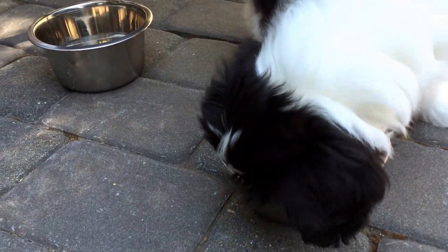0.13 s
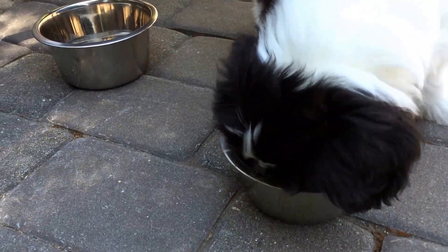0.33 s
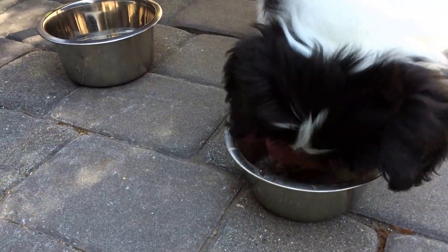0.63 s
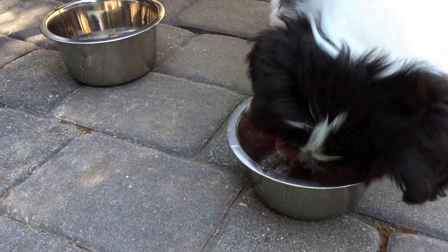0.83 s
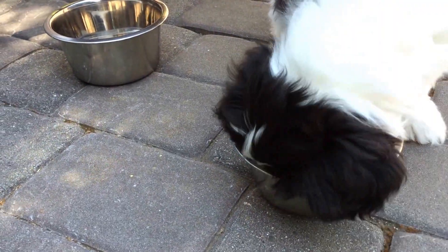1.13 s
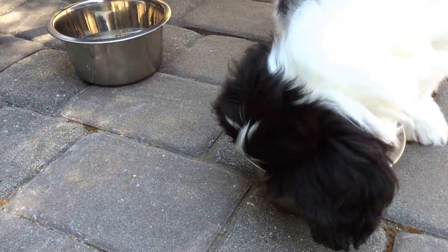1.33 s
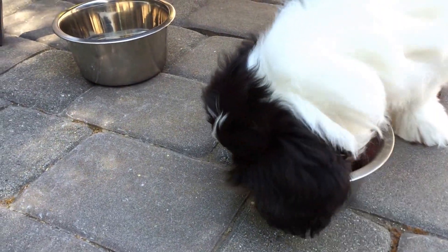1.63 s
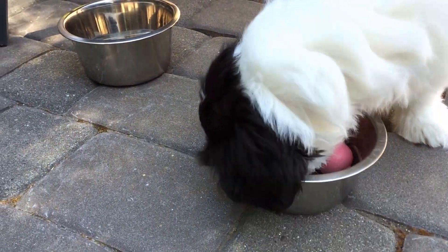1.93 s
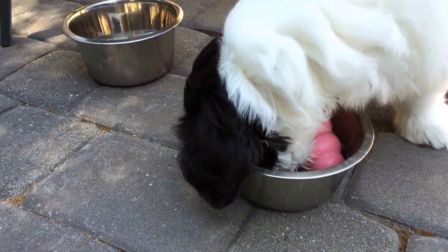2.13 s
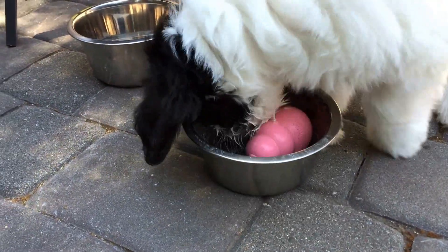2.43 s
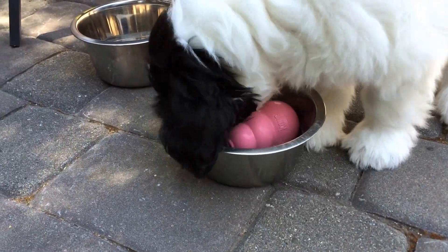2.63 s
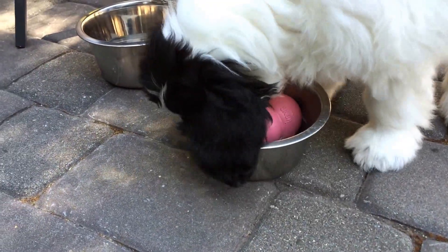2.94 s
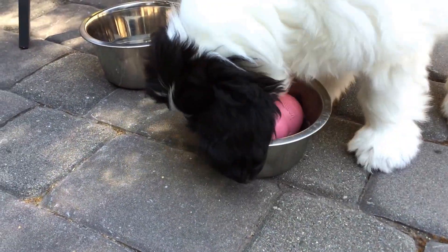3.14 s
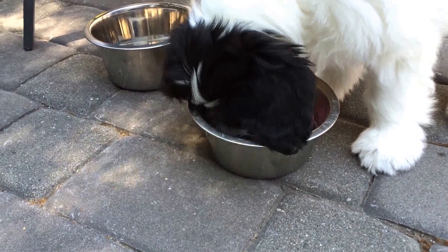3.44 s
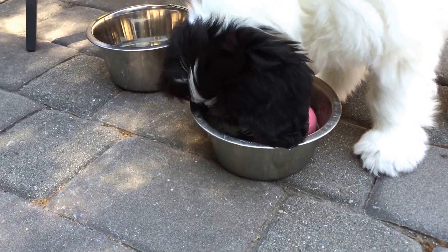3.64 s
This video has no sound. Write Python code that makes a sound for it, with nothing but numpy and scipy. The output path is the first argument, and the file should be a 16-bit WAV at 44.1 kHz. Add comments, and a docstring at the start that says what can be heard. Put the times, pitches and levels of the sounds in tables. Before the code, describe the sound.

A thin metal bowl scrapes on gritty paving, close and dry, outdoors. Faint scuffs and ticks until about 1 s, a short clinking scrape at 1.2, then stronger rasps from 1.5 with low microphone thuds near 1.7. From 2.1 to 2.8 s scraping is loudest and almost continuous, with sharp clacks and dull rubber bumps. Shorter scrapes and clinks follow, fading by 3.6 over soft distant traffic rumble.

```python
"""A thin steel bowl, pushed by a puppy's muzzle, skids over gritty paving stones close to the microphone.
Snapping grains and knocks from teeth and a rubber toy excite the bowl: hollow, wall, flank and rim ring
as banks of decaying sines. The toy itself bumps dully and a few low thuds shake the microphone, both as
short dying tones. Far off, traffic is coloured noise: hiss, a swelling rumble and narrow-band hums."""
import sys
import numpy as np
from scipy import signal
from scipy.fft import rfft, irfft
from scipy.io import wavfile
from scipy.ndimage import uniform_filter1d

SR = 44100
rng = np.random.default_rng(int(sys.argv[2]) if len(sys.argv) > 2 else 0)


def gain_from_db(level_db):
    """Convert decibel levels to linear amplitude factors (20 dB per decade)."""
    decades = np.asarray(level_db, float) / 20
    return 10 ** decades


def wrap_up_sound(samples):
    """Save the sound to the file named by the first command line argument, as 16-bit audio."""
    columns = np.atleast_2d(samples).T
    # keep every value between -1 and 1, then stretch to whole-number steps
    tamed = np.clip(columns, -1, 1)
    steps = np.round(tamed * 32767).astype(np.int16)
    wavfile.write(sys.argv[1], SR, steps)


N = 167580  # samples, 3.8 s

# Far traffic, spectrum shape: pitch_hz [Hz], level_db [dB per Hz, relative]
TRAFFIC_SPECTRUM = [(15, -59), (25, -26.5), (70, -3.5), (170, -3.5), (293, -11.5), (476, -19), (695, -27.5),
                    (962, -23), (1100, -21), (3820, -42), (4870, -47), (14800, -52), (16000, -66.5)]
# Swell of the low rumble and its hums: time_s [s], level_db [dB]
RUMBLE_SWELL = [(0.0, -51), (0.55, -49), (0.66, -49.5), (1.2, -57), (1.46, -56), (1.73, -49), (1.8, -58),
                (2.2, -55), (2.39, -52), (3.05, -52.5), (3.69, -53), (3.8, -50.5)]
# Traffic hums: pitch_hz [Hz], width_hz [Hz], level_db [dB relative to the rumble]
TRAFFIC_HUMS = [(85.1, 13, -5), (123.7, 41, -7.5), (174.4, 9.3, -15.5)]
# Knocks on the bowl: start_s [s], level_db [dB before the knock gains],
# hollow_db, wall_db, flank_db [dB relative to level_db]
BOWL_KNOCKS = [(0.0523, -53, -7, 19, 11.5), (0.2056, -12, -12, -0.5, -7), (0.3378, -50, 5, -8, -23),
               (0.4272, -55, -6, 8.5, -22), (0.5444, -61, -5, 9, -6), (0.7053, -56.5, 0, 10, -9),
               (0.7481, -49.5, 5, 16.5, -11), (0.8255, -54.5, 3, 2, -17), (0.944, -45, -1, 2, -16),
               (1.1827, -41, 6, -19, -36), (1.2003, -37.5, 10.5, 4.5, -21), (1.2358, -40, -8, -3, -26),
               (1.5797, -36, -21, 8.5, -23), (1.7832, -48, -9, -9, -16), (1.9108, -35, -14, -8, -16),
               (2.0035, -29, 6, -15, -27), (2.0977, -46.5, 5, -3, -17), (2.149, -32, -3, -14, -11),
               (2.3212, -20, -29, -9, -17), (2.4573, -15, -29, -19, -5.5), (2.6321, -19.5, -24, -14, -20),
               (2.6934, -41, 31, 5, 5), (2.7256, -21.5, -22, -13, -26), (2.8653, -42, -11, -18, -24),
               (2.9904, -24, -22, -27, -38), (3.0316, -36, -3, -20, -29), (3.2101, -25.5, 8.5, -3, -10),
               (3.236, -30, 4, -7, -10), (3.2947, -42.5, 2, 2, 4), (3.3664, -50, -1, -12, -21),
               (3.3992, -36, -16, -10, -24), (3.5084, -40, -4, -5, -16), (3.6644, -57, -4.5, -5, -10),
               (3.7375, -57, -19, 6, 15.5)]
# Skids, one list each, of level points: time_s [s], grit_db [dB before the layer gains],
# hollow_db, wall_db, flank_db [dB relative to grit_db]
SKID_LEVELS = [
    [(0.09, -83, 2, 11, 3), (0.102, -71.5, -7, -9, 8), (0.124, -64, 11.5, 5, -19), (0.146, -71, 8, 6, -5),
     (0.17, -55, -1.5, 4, -31), (0.198, -53.5, 3, -10, 4)],
    [(0.23, -53, -11, 6, 2.5), (0.262, -71, -9, 2, -15), (0.296, -74, -3, 9, -9), (0.346, -69.5, 9, 2, -11),
     (0.372, -83, 6, 16, -5), (0.38, -97, 20, 18, 6)],
    [(0.5, -84, 18, 17, 2), (0.552, -79, 16, 8, -3), (0.604, -97, 32, 24, 3), (0.718, -79.5, 18, 6, -1),
     (0.74, -89.5, 28, 13, -13), (0.748, -60, 1, 14, 1), (0.808, -94, 30, 5, -14), (0.83, -66, 7, 6, -7),
     (0.848, -80, 19, 10, -1), (0.9, -72, 0, 2, 0)],
    [(0.9, -72, 1.5, 3, -3), (0.964, -59.5, 3, 2, -8), (0.978, -72, 4, -5, -5), (0.988, -82, 9, 12, 0),
     (1.0, -79, 18, 8, -9)],
    [(1.17, -103, 12, 6, 4), (1.182, -58.5, 6, 8, -14), (1.19, -62.5, -3, -13, -13),
     (1.204, -48, 8, 1, -28), (1.226, -74.5, -2, -2, 5), (1.242, -56, 12, 4, -20),
     (1.254, -76, 5, -18, -12), (1.27, -82, 8, 13, -9)],
    [(1.49, -87, 11, -1, 8), (1.518, -60, 3, 3, -22), (1.548, -77, 9, 16, -7),
     (1.598, -43.5, -11.5, 5.5, -12), (1.64, -51, 4.5, -8, -34), (1.688, -50, 7.5, -9.5, -24),
     (1.754, -66.5, 1, 4, -5), (1.77, -94, 6, 23, -8), (1.784, -60, -1, -5, -6), (1.83, -75, -10, -1, -15)],
    [(1.83, -74, 6, 3, -13), (1.842, -62.5, 11, -6, -22), (1.876, -47, -3.5, -17, -12),
     (1.902, -55.5, 7.5, 4, -3), (1.912, -40.5, -13, 5, -4), (1.938, -52, 4, -4, -11),
     (1.95, -47, 2.5, 7, -6), (1.982, -53.5, 9, -2, -15), (2.024, -48, 10.5, -15, -17),
     (2.07, -72.5, 0, 9, -11)],
    [(2.07, -65.5, 7, 9, -3), (2.142, -67.5, 9, -7, -13), (2.148, -58, 4, -16, -19),
     (2.172, -43.5, 3, -3, -28), (2.196, -38, -5, -10.5, -31), (2.246, -38.5, -12.5, 6, -16.5),
     (2.266, -34.5, -8, -10, -7), (2.312, -39, -6, 7.5, -8), (2.324, -39, -6, 1, -5.5),
     (2.36, -45.5, -5, -0.5, -3)],
    [(2.36, -49, 7.5, 7, -2), (2.374, -40, -11, 1.5, -1.5), (2.45, -38.5, -7.5, -1, -12),
     (2.462, -31.5, -8.5, -4, -19), (2.474, -39, -5.5, -2.5, -7), (2.514, -43, -3.5, 4.5, 0),
     (2.526, -38, -2, -3, -8), (2.586, -51, -13, 6.5, -2), (2.6, -45.5, -11, -7, 2),
     (2.62, -43.5, 5, -22, -10)],
    [(2.62, -53.5, -1, 10, 0), (2.636, -38, 0.5, -9, -8.5), (2.652, -45, -5.5, -10, -31),
     (2.704, -38.5, -0.5, 0, -4), (2.734, -40.5, -7.5, -1, -19), (2.742, -42.5, -6, 3.5, -5.5),
     (2.776, -44.5, -7.5, -17, -15), (2.834, -62.5, 3.5, 2, -22), (2.872, -58.5, -2, -11, -22),
     (2.9, -82, 8, -4, -12)],
    [(2.9, -80, 0, -7, -21), (2.948, -57.5, -3, -13, -8), (2.982, -75, -4, 3, -8),
     (2.988, -66, -22, -25, -17), (2.996, -48.5, -7, -9, -11), (3.02, -75, 4, 9, -13),
     (3.04, -45.5, -12.5, -15, -30), (3.09, -55, -4.5, -3.5, -16), (3.102, -53.5, -10, -22, -21),
     (3.18, -77.5, 13, 6, -3)],
    [(3.18, -65, 1, 5, -8), (3.2, -63.5, -17, 3, -19), (3.21, -43, 7, 5.5, -5), (3.232, -49, 8.5, 4, 0.5),
     (3.238, -45.5, 5.5, 5.5, -9), (3.262, -65, 16.5, 13, -3), (3.282, -57, 3, -5, -20),
     (3.302, -48.5, 0, -6.5, 1), (3.35, -82, 21, 13, -12)],
    [(3.36, -78, 13, 8, 0), (3.366, -70, 7, -8, -24), (3.374, -55.5, 1, -7, -25),
     (3.39, -55, -11, -16, -27), (3.402, -45, -2, -10, -44), (3.42, -42, -8, -13, -39),
     (3.436, -45, -10, -20, -31), (3.448, -68, -17, -15, -21), (3.46, -59, 13.5, 5, 0)],
    [(3.47, -71, 12, 2, -5), (3.492, -57.5, -1, 3, -16), (3.518, -59, 11, 12, -1), (3.536, -49, -6, 6, -15),
     (3.564, -76, 3, 11, 0), (3.58, -84, 16, 15, -14)],
]
# Ringing modes of the bowl: pitch_hz [Hz], level_db [dB relative], t60_s [s, undamped]
BOWL_MODES = [(558, -7.5, .04), (629, 1.5, 0.047), (753.6, -1, 0.042), (912.6, 0, 0.047),
              (1072, -6.5, 0.043), (1390, -34, 0.11), (1540.5, 4.5, 0.051), (1651, -6, .17),
              (1745, -5, 0.05), (1890, -16.5, .25), (2075, -18.5, 0.11), (2495, -7, 0.082),
              (2780, -5.5, 0.036), (3060, 0, 0.071), (3392, 3.5, 0.023), (3697, -5.5, .08),
              (4070, -0.5, 0.014), (4960, -6, 0.064), (5690, 6, .06), (6050, -2, 0.029), (6870, -8, .025),
              (7460, -7.5, 0.023), (7690, -6, 0.018), (8530, -1.5, .08), (9300, -1, .02),
              (10000, -3, 0.095), (10660, -0.5, 0.034), (11700, -6, 0.04), (13000, -2, .02)]
# Mode ranges of rim, hollow, wall and flank, in that order: from_hz [Hz], to_hz [Hz]
BOWL_PARTS = [(4500, 20000), (0, 1200), (1200, 2300), (2300, 4500)]
# Direct sound of grit and teeth, spectrum shape: pitch_hz [Hz], level_db [dB per Hz, relative]
GRIT_SPECTRUM = [(2530, -49), (4300, -37), (4760, -18.5), (5500, -1), (6330, -6.5), (6970, -5),
                 (9410, -12.5), (11500, -10.5), (15500, -16)]
# Dull bumps of the rubber toy: start_s [s], level_db [dB before the thump gain], pitch_hz [Hz]
TOY_BUMPS = [(1.64, -39.5, 585), (1.859, -44, 326), (1.945, -29, 513), (2.019, -26, 732), (2.166, -30, 930),
             (2.521, -37, 257), (2.616, -27, 417), (2.693, -26, 724), (2.995, -42, 324)]
# Low thuds at the microphone: start_s [s], level_db [dB before the thump gain], pitch_hz [Hz]
LOW_THUDS = [(1.681, -29, 99.6), (1.718, -32.5, 97), (1.743, -25, 115), (1.791, -35, 81),
             (1.821, -35.5, 95)]

TRAFFIC_HISS_DB, RUMBLE_TOP_HZ = -51.5, 356
KNOCK_PUSH_S, CRACK_T60_S = 0.00015, 0.045  # time to the peak of the push; decay of the crack's noise
KNOCK_BRIGHT_DB, KNOCK_BODY_DB = -2.5, -7  # crack with rim; hollow, wall and flank
KNOCK_SPOT_DB = 1.5  # spread of mode levels from knock to knock
GRAINS_PER_S, GRAIN_SPREAD_DB = 7000, 2
JUDDER_DB, JUDDER_PER_S = 1.5, 70  # rms depth and rate of the base's judder
CONTACT_DB, CONTACT_PER_S = 4.0, 18  # rms depth and rate of the wandering contact
SKID_T60_SHARE, SKID_DETUNE = 0.75, 0.035  # share of t60 left under load; pitch ratio above 1 of the twins
RIM_RING_DB, GRIT_DIRECT_DB = -3.5, 2.0
BOWL_LOW_HZ, MIC_TOP_HZ = 475, 15430


def unit(x):
    """Scale to rms 1."""
    return x / np.sqrt(np.mean(x ** 2))


def peak_one(x):
    """Scale to peak 1."""
    return x / np.max(np.abs(x))


def colour(x, spectrum):
    """Minimum-phase filter with the given (Hz, dB) shape and unit energy."""
    hz, db = np.array(spectrum).T
    f = np.fft.rfftfreq(4096, 1 / SR)
    log_gain = np.interp(np.log(f + 1), np.log(hz), db) * np.log(10) / 20
    # folding the cepstrum onto positive time makes the filter causal
    cepstrum = irfft(log_gain)
    cepstrum[1:len(cepstrum) // 2] *= 2
    cepstrum[len(cepstrum) // 2 + 1:] = 0
    response = irfft(np.exp(rfft(cepstrum)))
    return signal.fftconvolve(x, response / np.sqrt(np.sum(response ** 2)))[:len(x)]


def walk(rate):
    """Random levels held 1 / rate seconds and slewed, rms 1."""
    hold = int(SR / rate)
    steps = np.repeat(rng.standard_normal(N // hold + 1), hold)
    return unit(uniform_filter1d(steps, hold)[:N])


def ring(modes, t60_share):
    """Decaying sines of some bowl modes, neighbours in opposite phase, each t60 scaled by t60_share."""
    t = np.arange(SR // 4) / SR
    total = np.zeros(len(t))
    for k, (hz, db, t60) in enumerate(modes):
        decay = 1000. ** (-t / (t60 * t60_share))
        total += (-1) ** k * gain_from_db(db) * np.sin(2 * np.pi * hz * t) * decay
    return total


def thumps(table, cycles):
    """Soft blows: each tone swells quickly, then dies over a few cycles."""
    out, t = np.zeros(N + SR), np.arange(SR // 4) / SR
    for start_s, db, hz in table:
        swell = 1 - np.exp(-4.5 * t * hz)
        decay = np.exp(-2.5 * t * hz / cycles)
        tone = np.sin(2 * np.pi * hz * t) * swell * decay
        out[int(start_s * SR):][:len(t)] += gain_from_db(db) * tone * gain_from_db(1.5)
    return out[:N]


def distant_traffic(t):
    """Far traffic as noise: a wavering hiss, and a rumble whose narrow-band hums swell with it."""
    noise = unit(colour(rng.standard_normal(N + SR), TRAFFIC_SPECTRUM)[SR:])  # first second settles
    low = signal.sosfilt(signal.butter(2, RUMBLE_TOP_HZ, fs=SR, output="sos"), noise)
    hum = np.zeros(N)
    for hz, width_hz, db in TRAFFIC_HUMS:
        b, a = signal.iirpeak(hz, hz / width_hz, fs=SR)
        hum += gain_from_db(db) * unit(signal.lfilter(b, a, rng.standard_normal(N + SR))[SR:])
    hiss = gain_from_db(TRAFFIC_HISS_DB) * gain_from_db(1.05 * walk(5.35)) * (noise - low)
    time_s, db = np.array(RUMBLE_SWELL).T
    return hiss + gain_from_db(np.interp(t, time_s, db)) * (unit(low) + hum)


def bowl_knocks():
    """A short rough push at a new spot rings each part of the bowl, with a bright crack on top."""
    out, t = np.zeros(N + SR), np.arange(SR // 4) / SR
    for start_s, db, *part_db in BOWL_KNOCKS:
        roughness, crack_noise = rng.standard_normal((2, len(t)))
        push = ((1 + 0.3 * roughness) * t * np.exp(-t / KNOCK_PUSH_S))[:SR // 50]
        # the spot struck favours some modes over others
        spot_db = KNOCK_SPOT_DB * rng.standard_normal(len(BOWL_MODES))
        struck = [(hz, g + change, t60) for (hz, g, t60), change in zip(BOWL_MODES, spot_db)]
        rung = []
        for lo, hi in BOWL_PARTS:
            modes = [m for m in struck if lo <= m[0] < hi]
            rung.append(peak_one(signal.fftconvolve(np.diff(push), ring(modes, 1))[:len(t)]))
        rim, *parts = rung
        crack = peak_one(colour(crack_noise * 1000. ** (-t / CRACK_T60_S), GRIT_SPECTRUM))
        bright = crack + gain_from_db(-18) * rim
        body = sum(gain_from_db(g) * part for g, part in zip(part_db, parts))
        knock = gain_from_db(KNOCK_BRIGHT_DB) * bright + gain_from_db(KNOCK_BODY_DB) * body
        out[int(start_s * SR):][:len(t)] += gain_from_db(db) * knock
    return out[:N]


def grit_grains(judder):
    """Grit snaps as sparse impulses of random size, louder and softer with the judder."""
    present = rng.random(N) < GRAINS_PER_S / SR
    size = gain_from_db(GRAIN_SPREAD_DB * np.minimum(rng.exponential(size=N), 4.5))
    return unit(present * size * rng.standard_normal(N) * judder)


def skid_envelope(t, part):
    """Level over time of one bowl part (0 is the rim and grit), silent between skids."""
    envelope = np.zeros(N)
    for points in SKID_LEVELS:
        rows = np.array(points)
        time_s, db = rows[:, 0], rows[:, 1]
        if part:
            db = db + rows[:, 1 + part]
        envelope += gain_from_db(np.interp(t, time_s, db)) * (t >= time_s[0]) * (t < time_s[-1])
    return envelope


def bowl_skids(t):
    """Grains snap under the juddering base; as the contact wanders, each mode swells and fades."""
    out = np.zeros(N)
    judder = gain_from_db(JUDDER_DB * walk(JUDDER_PER_S))
    for part, (lo, hi) in enumerate(BOWL_PARTS):
        push = grit_grains(judder) * skid_envelope(t, part)
        rung, energy = np.zeros(N), 0
        for hz, db, t60 in BOWL_MODES:
            if not lo <= hz < hi:
                continue
            for pitch in (hz, hz * (1 + SKID_DETUNE)):  # each mode has a sharper twin
                response = ring([(pitch, db, t60)], SKID_T60_SHARE)[:SR // 10]
                contact = unit(gain_from_db(CONTACT_DB * walk(CONTACT_PER_S)))
                rung += signal.oaconvolve(push * contact, response)[:N]
                energy += np.sum(response ** 2)
        rung = rung / np.sqrt(energy)
        if part == 0:  # the rim comes with the direct sound of the grit
            rung = gain_from_db(RIM_RING_DB) * rung + gain_from_db(GRIT_DIRECT_DB) * colour(push, GRIT_SPECTRUM)
        out += rung
    return out


def toy_bumps():
    """The rubber toy is well damped: dull tones that die within some cycles."""
    return thumps(TOY_BUMPS, cycles=11)


def low_thuds():
    """Low thuds shake the microphone: deep tones that die almost at once."""
    return thumps(LOW_THUDS, cycles=2.8)


def scene():
    """Traffic, bowl, toy and thuds in mono; the small bowl radiates no bass."""
    t = np.arange(N) / SR
    traffic = distant_traffic(t)
    high_pass = signal.butter(4, BOWL_LOW_HZ, "high", fs=SR, output="sos")
    bowl = signal.sosfilt(high_pass, bowl_knocks() + bowl_skids(t))
    return (traffic + bowl + toy_bumps() + low_thuds())[None]


def band_limit(x):
    """A steep low-pass at the top of the band."""
    return signal.sosfilt(signal.butter(12, 16420, fs=SR, output="sos"), x)


def record(dry):
    """The camera's microphone cuts the extreme treble with a steep low-pass."""
    low_pass = signal.ellip(8, 0.5, 30, MIC_TOP_HZ, fs=SR, output="sos")
    return band_limit(signal.sosfilt(low_pass, dry))


dry = scene()
out = record(dry)
wrap_up_sound(out)
```